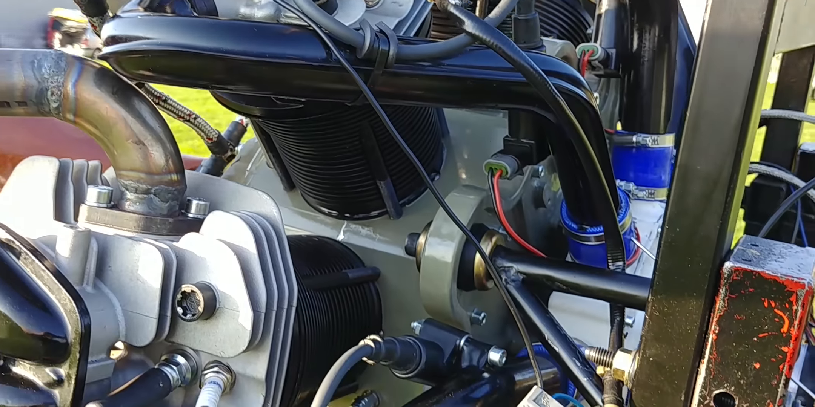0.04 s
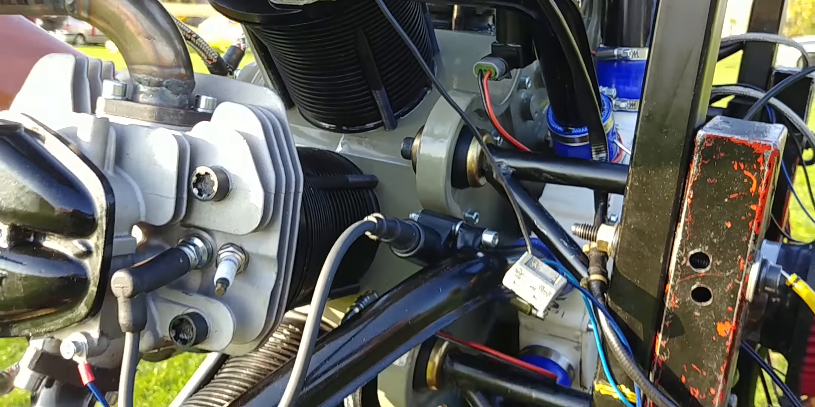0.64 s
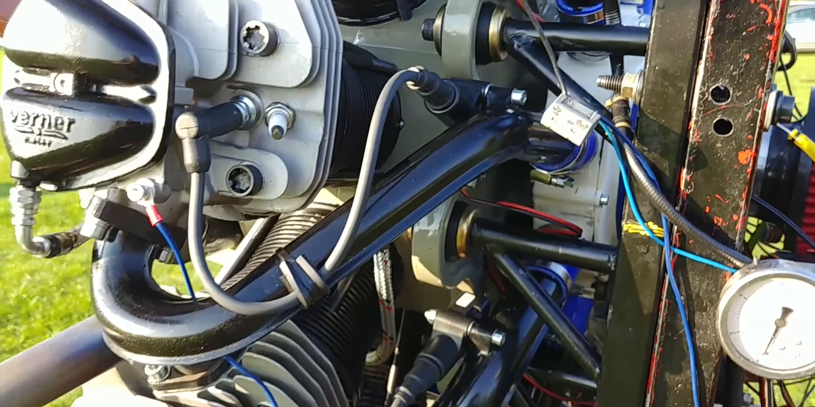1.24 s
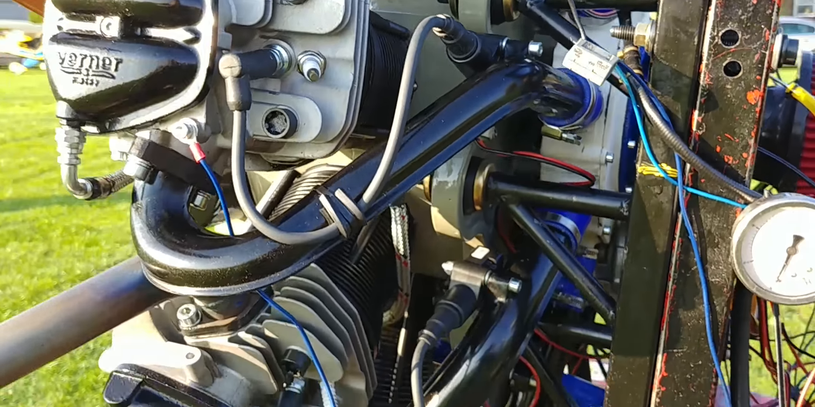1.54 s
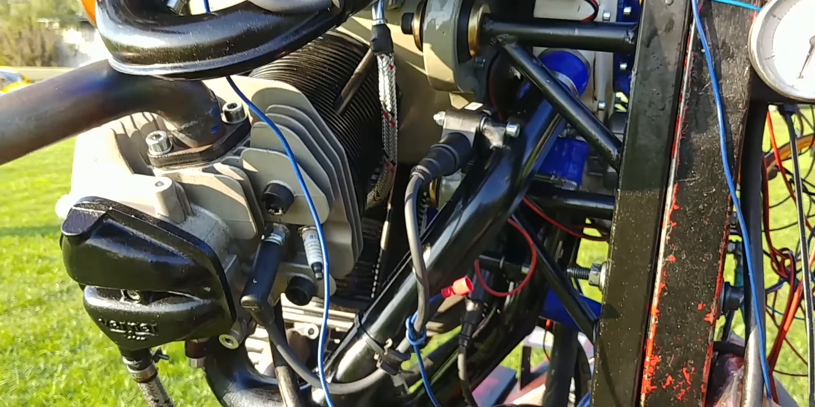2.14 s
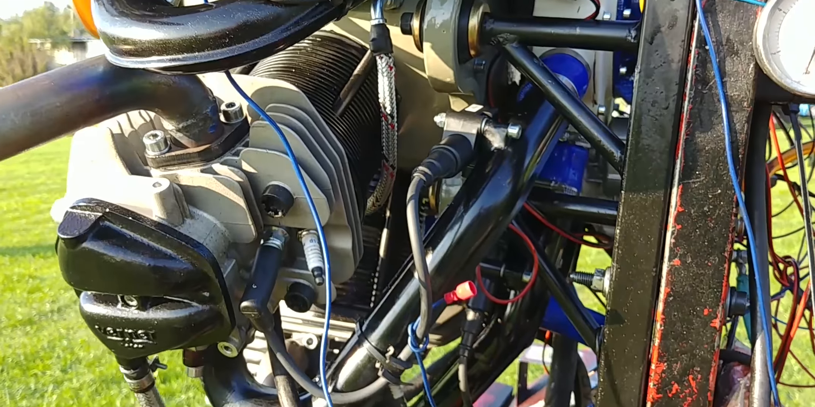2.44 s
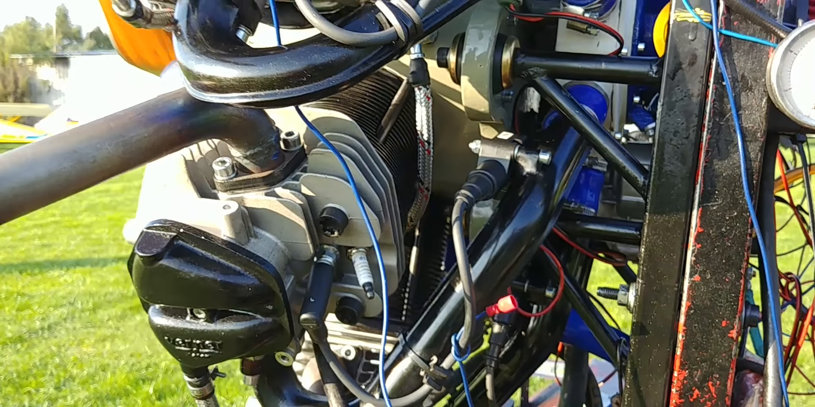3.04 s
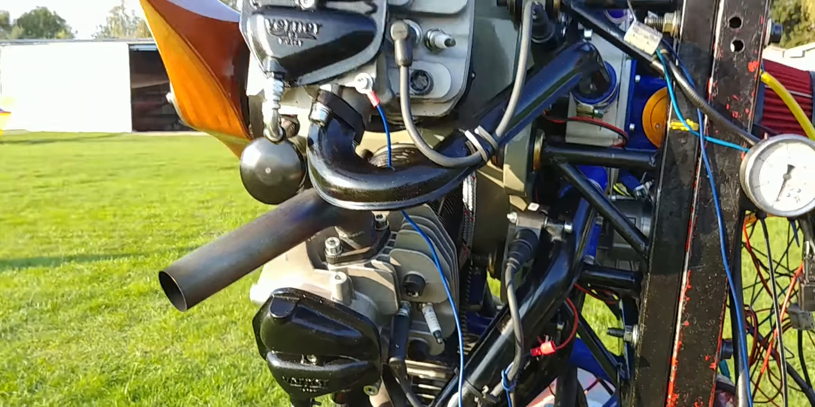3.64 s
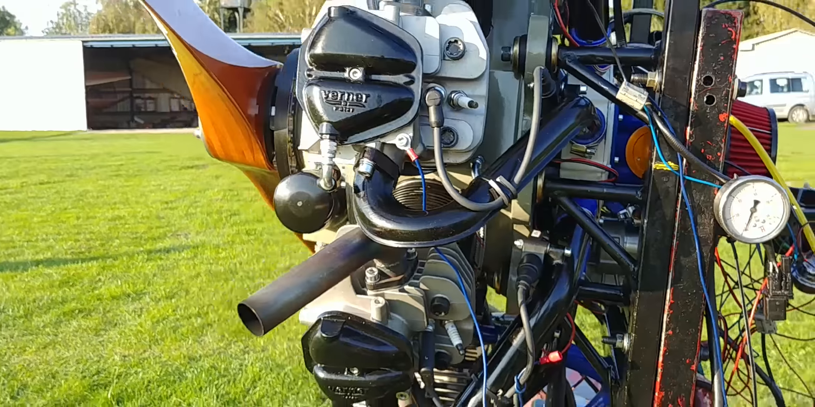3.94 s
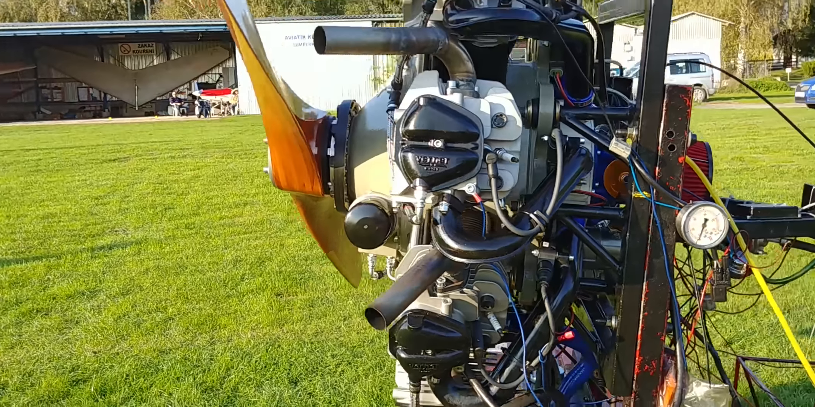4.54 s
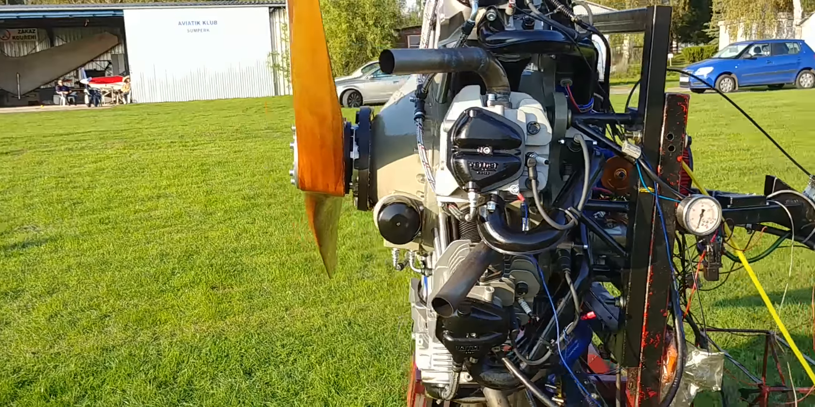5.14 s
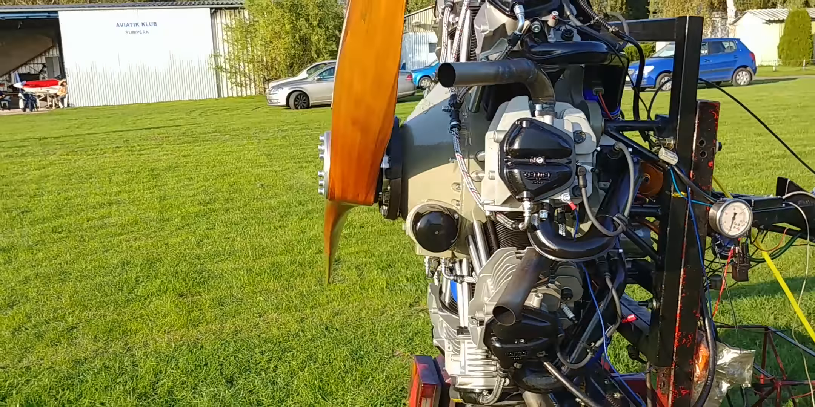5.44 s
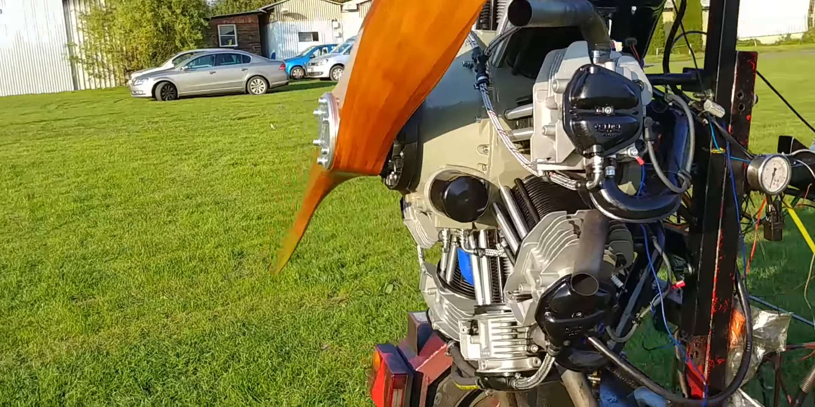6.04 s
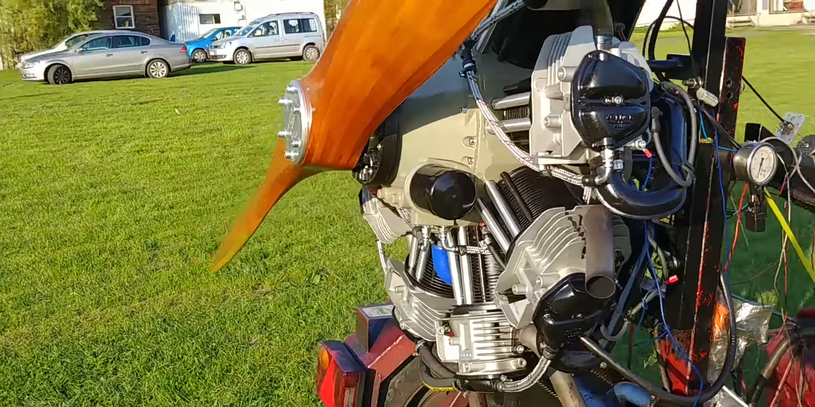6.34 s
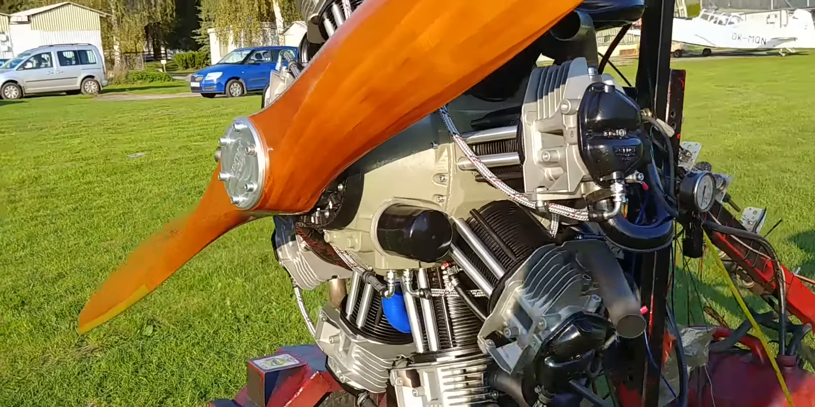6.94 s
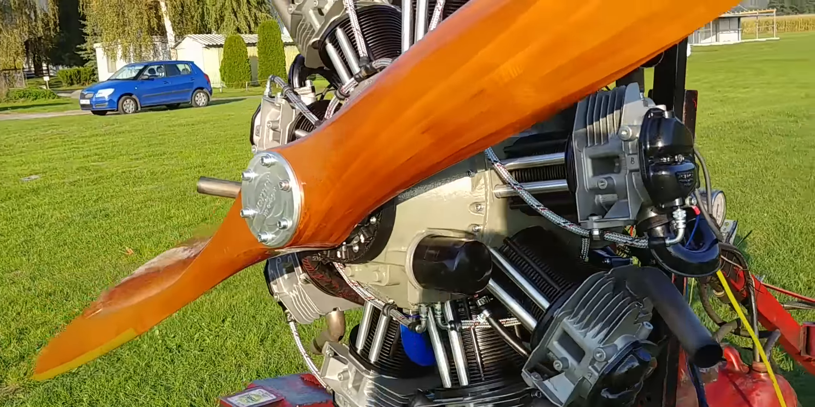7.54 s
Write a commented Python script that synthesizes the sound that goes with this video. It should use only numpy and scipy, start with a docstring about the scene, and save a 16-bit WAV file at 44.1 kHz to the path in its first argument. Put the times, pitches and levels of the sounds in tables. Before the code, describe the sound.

A radial aircraft engine idles fast with a deep throb, spitting exhaust and clinking valves, then speeds up as the propeller's buzzing wash takes over.

```python
"""A radial engine with a wooden propeller idles fast on a stand in a field, sags a little, then picks up.
Six exhaust beats fill each cycle of two turns. Together they make a deep throb, and each one spits
a rasp from the open pipes. The valve gear clinks and knocks. A two-sided microphone moves from the
cylinders to the front, where the rasp fades and the wash of air from the blades takes over."""
import sys
import numpy as np
from scipy import signal
from scipy.fft import rfft, irfft, next_fast_len
from scipy.io import wavfile
from scipy.ndimage import uniform_filter1d, minimum_filter1d

SR = 44100
rng = np.random.default_rng(int(sys.argv[2]) if len(sys.argv) > 2 else 0)


def wav_out(sig):
    """Save sig, one row per channel (or a flat mono array), as 16-bit PCM at SR to the path in sys.argv[1]."""
    wavfile.write(sys.argv[1], SR, np.round(np.clip(np.atleast_2d(sig).T, -1, 1) * 32767).astype(np.int16))


N = 343980
TIME_S = np.arange(N) / SR

# How fast the shaft turns: time_s, speed_rpm
SHAFT_SPEED = [(0, 1311), (.8, 1328), (1.26, 1243), (1.39, 1212), (1.92, 1194), (2.72, 1167), (3.63, 1168),
               (4.01, 1174), (4.06, 1185), (4.8, 1199), (5.22, 1252), (5.55, 1327), (5.9, 1385),
               (6.22, 1408), (6.57, 1425), (6.89, 1541), (7.18, 1628), (7.43, 1662), (7.66, 1674),
               (7.8, 1699)]
# The walk, from 0 beside the cylinders to 1 in front: time_s, position
WALK = [(0, 0.027), (3.7, 0.05), (4.2, 0.18), (5.2, 0.39), (6.2, 0.55), (6.75, 0.72), (7.8, 0.98)]
# How hard the engine works: time_s, boom_db, spit_share
EFFORT = [(0, 8.5, 0.86), (2.7, 8, 0.69), (4.3, 4, 0.42), (6.1, 6.5, 0.5), (7.2, 8, 0.2), (7.8, 6, 0.1)]
# The six exhaust beats: place_cycles, thump_db, spit_db, sizzle_db
BEATS = [(0.114, 8.5, 22, 20), (.272, -3, 19.5, 20), (0.437, -0.7, 15.5, 13), (0.621, 9, 21, 20),
         (0.785, 6, 21, 16.5), (0.942, 8, 20.5, 22)]
# Main harmonics, each swelling or dipping near one speed: harmonic, base_db, lift_db, at_rpm, width_rpm
MAIN_HARMONICS = [(6, -54.5, 27.5, 1682, 576), (7, -63.5, 24.5, 1320, 67), (9, -56, 20, 1453, 530),
                  (11, -53, 15.5, 1400, 300), (12, -38.5, 9.5, 1210, 256), (13, -47.5, -18, 1190, 82),
                  (14, -46.5, -0.5, 1200, 250), (15, -43, 10.5, 1335, 460), (16, -52, 9.5, 1600, 130),
                  (17, -44, 1.5, 420, 360), (18, -38, -23, 1376, 60), (20, -47.5, -12, 1100, 87),
                  (21, -56, 20, 1203, 225), (22, -63.5, 20, 1200, 360), (24, -45, 5.5, 1410, 70),
                  (27, -62, 17, 1170, 54), (28, -63.5, 14.5, 1395, 93), (30, -61, 12.5, 1296, 180)]
# The pipes' boom, which shapes the other harmonics: pitch_hz, level_db
BOOM_SPECTRUM = [(30, -89), (50, -86), (68, -58.5), (84, -52.5), (112, -56), (135, -46), (165, -50.5),
                 (225, -51), (262, -57.5), (287, -66.5), (345, -64), (410, -79.5), (520, -85), (700, -104)]
# The pipes' lowest resonances, which delay the thumps: pitch_hz, width_hz
PIPE_MODES = [(96, 20.8), (214, 48.5)]
# How the bass leans to one side: time_s, left_minus_right_db
BASS_SWAY = [(0, 0), (1.4, 2.1), (3.6, 3.2), (5.8, 2.2), (7.8, -.8)]
# The propeller's hum: blade_harmonic, level_db
DRONE_HARMONICS = [(1, -44), (2, -37.5)]
# One pipe's hollow pop: time_s, level_db
CHUG_LEVEL = [(0, -56), (1.1, -55.5), (2, -47.5), (2.8, -43), (3.7, -55), (4.6, -49.5), (5.3, -51.5),
              (6.1, -50.5), (7, -62), (7.8, -64)]
# The rasp's two lower resonances, changing as other pipes face us: time_s, level_db, pitch_hz
BARK = [(0, -50, 2380), (1.3, -44.5, 2000), (3.2, -40, 2320), (4.3, -43.5, 1926), (5.2, -43, 1870),
        (5.9, -41, 1930), (6.4, -43, 1780), (6.8, -49, 1665), (7.1, -50, 2040), (7.8, -50, 2200)]
RING = [(0, -42, 2800), (.8, -42, 3040), (1.401, -49, 3480), (2.699, -46, 3400), (3.502, -51, 3290),
        (4.099, -59.5, 3150), (5.1, -52.5, 3450), (5.4, -45, 3480), (6.1, -44, 3490), (6.4, -41.5, 3220),
        (6.6, -42.5, 2740), (6.85, -42.5, 2490), (7.05, -52, 2490), (7.2, -51, 3540), (7.8, -52.5, 3510)]
# Its two upper ones; the sizzle swells as a pipe's mouth sweeps past: time_s, level_db
HISS = [(0, -50.5), (.9, -55.5), (1.2, -59.5), (3.2, -56), (4.6, -48.5), (6.7, -46.5), (7.05, -54),
        (7.8, -56)]
SIZZLE = [(0, -44.5), (.9, -46), (1.3, -46.5), (3.1, -47), (3.42, -41.5), (3.7, -48), (4.3, -54.5),
          (5.1, -50), (5.4, -44.5), (5.65, -49.5), (6.1, -47), (6.8, -46.5), (7, -53.5), (7.8, -53.5)]
# Widths of bark, ring, hiss and sizzle in the pipes, heads and fins: side_octaves, front_octaves
METAL_WIDTHS = [(0.18, 0.21), (0.21, 0.14), (0.21, 0.23), (0.068, 0.072)]
# The highest treble: pitch_hz, level_db
FIZZ_SPECTRUM = [(5000, -27.5), (9000, -2), (10300, -39), (11800, -19), (13500, -5.5), (15800, -21.5)]
# Its brief swell: middle_s, lift_db, half_length_s
FIZZ_SWELLS = [(6.6, 17.5, 0.33)]
# The crankcase's echo along the walk: time_s, delay_ms, strength
CRANKCASE_ECHO = [(0, 2.66, 0.5), (.5, 2.17, 0.26), (1.3, 2.2, 0.12), (2.2, 1.79, 0.03), (4.5, 1.65, 0.01),
                  (6.5, 2.23, 0.14), (7.8, 1.7, .12)]
# The rasp of the pipes on the other side: time_s, level_db, pitch_hz
FAR_RASP = [(0, -61, 6300), (1, -59, 6200), (1.12, -70, 6000), (4.8, -73, 3600), (5.4, -48.5, 3610),
            (6.3, -51.5, 3470), (6.75, -44, 3370), (7.05, -50, 3370), (7.8, -67, 3290)]
# Air rushing off the blades: time_s, level_db, pitch_hz
BLADE_RUSH = [(0, -45, 1340), (1.4, -48, 1430), (3.2, -43, 1386), (4.3, -45, 1245), (5.4, -36.5, 1447),
              (6.65, -42.5, 1270), (7.25, -38, 1243), (7.8, -41, 1240)]
# The slap of the blades: pitch_hz, level_db
SLAP_SPECTRUM = [(400, -58.5), (500, -51.5), (580, -57.5), (770, -53.5), (880, -68), (1050, -60.5),
                 (1250, -59), (1400, -60), (1700, -72)]
# The valve gear's ring (a fade is a fall of 60 dB): pitch_hz, level_db, fade_s
VALVE_MODES = [(1670, -8.5, .03), (2070, 4.5, 0.11), (2260, -1, .04), (2430, 4.5, 0.089), (2658, 2, 0.1),
               (2880, -3, 0.083), (3380, 0, .045), (3540, -2, 0.058), (3820, -5.5, 0.045),
               (4620, -14, 0.045)]
# Its loudness, highest near the rocker covers: time_s, level_db
VALVE_LEVEL = [(0, -46), (1.4, -47.5), (2.5, -44), (3.3, -45), (4, -56), (7.8, -62)]
# The sharpest exhaust cracks: start_s, peak_db (not used), ring_db, sizzle_db
CRACKS = [(0.0827, -30, -38, -36), (0.2365, -28, -40, -51), (0.388, -28, -35, -32), (0.4475, -26, -40, -43),
          (0.539, -28, -37, -47), (0.63, -29, -32.5, -40), (0.7214, -27, -30.5, -33),
          (0.8113, -26, -33, -35), (0.9006, -23, -34, -26.5), (0.995, -28, -29.5, -42),
          (1.0906, -31, -55, -39.5), (1.1807, -29, -57, -36), (1.4447, -36, -42, -43),
          (1.476, -32, -38, -57), (1.5434, -34, -56, -41), (1.575, -21, -48, -42), (1.644, -33, -47, -39.5),
          (1.6767, -35, -40, -51), (1.7447, -32, -32, -46), (1.7759, -34, -44, -40.5),
          (1.8434, -32, -41, -35.5), (1.975, -27, -34, -33), (2.0757, -30, -35.5, -42.5),
          (2.146, -36, -45, -35.5), (2.449, -30, -31.5, -37), (2.5526, -33, -34, -49),
          (2.603, -34, -30, -54), (2.634, -34, -47, -55), (3.272, -32, -34, -54), (3.376, -30, -43.5, -49),
          (5.884, -34, -55, -42), (5.913, -26, -38, -59), (6.0551, -31, -33, -47), (6.2, -30, -40, -42.5),
          (6.3116, -29, -39, -37.5), (6.704, -29, -44, -38)]
# The two parts of a crack: pitch_hz, level_db
CRACK_RING = [(200, -61), (1200, -17), (2100, -3.5), (2600, 0), (3100, -7.5), (3700, 1.5), (4300, -8.5),
              (5500, -20.5), (9000, -73)]
CRACK_SIZZLE = [(3000, -60), (5500, -19), (6500, -13.5), (7700, -1), (8200, 0.5), (9000, -18.5),
                (10200, -53), (13000, -47), (15800, -54)]
# Dull knocks and thin valve pings: start_s, level_db, pitch_hz
KNOCKS = [(4.025, -42, 2080), (4.0572, -33, 1960), (4.2582, -32, 2030), (4.311, -32, 1930),
          (4.7576, -33, 1800), (4.8608, -30, 1960), (4.9064, -31, 1900), (4.9591, -38, 1930),
          (5.0056, -31, 1970), (5.0784, -26, 1840), (5.1497, -34, 1920), (5.197, -24, 1670),
          (5.25, -33, 2000), (5.3433, -29, 1930), (5.437, -32, 1120), (5.6403, -26, 1800),
          (5.7044, -34, 915), (5.7962, -33, 1990), (6.7283, -32, 1450), (7.1395, -27, 1300),
          (7.2456, -36, 1130), (7.3184, -38, 1340), (7.3362, -33, 1310), (7.4086, -29, 1100),
          (7.428, -34, 1150), (7.4435, -25.5, 1075), (7.4973, -38, 1330), (7.516, -36, 1220),
          (7.5708, -28, 1110), (7.7134, -27, 1160), (7.783, -28.5, 1250)]
PINGS = [(5.8845, -36, 7810), (6.0282, -38, 8100), (6.1998, -28.5, 7850), (6.2841, -37, 7740),
         (6.3694, -35, 7710), (6.7037, -30.5, 7800), (6.8638, -34.5, 7600)]
# How each of them rings: pitch_ratio, level_db, fade_s
KNOCK_MODES = [(.76, -2.5, 0.026), (1.001, 2.5, 0.043), (1.2, -5, 0.028)]
PING_MODES = [(0.999, 5, 0.042), (1.03, -3, 0.035)]
# How much of the right side's shading each pitch feels: pitch_hz, factor
RIGHT_SHADE = [(200, -2.5), (380, 0), (700, 0.82), (1500, 1.1), (2400, 0.94), (4000, 0.3), (5500, 1.2),
               (7700, 2), (9000, 0.8), (10500, 0)]
# How alike the two sides sound: pitch_hz, likeness
LIKENESS = [(300, 0.44), (700, 0.84), (1500, 0.63), (3200, 0.57), (5500, 0.18), (8000, 0.25),
            (11000, 0.082)]

LEFT_LAG_MS = (0.506, 0.033)  # beside the engine, in front
BLADE_PASSES, BLADE_PLACE = 4, 0.225  # passes per cycle; where in the cycle one falls


def amp(db):
    return 10 ** (np.asarray(db) / 20)


def unit(x):
    """Scale x to an average (rms) level of 1."""
    return x / np.sqrt(np.mean(x ** 2) + 1e-20)


def bell(x, centre, width):
    return np.exp(-((x - centre) / width) ** 2)


def at_pitch(points, hz):
    """Look up a (pitch_hz, value) table on a log scale."""
    pitches, values = np.transpose(points)
    return np.interp(np.log(hz + 1), np.log(pitches + 1), values)


def curves(rows):
    """One value per sample for each column after the time."""
    times, *columns = np.transpose(rows)
    return [np.interp(TIME_S, times, column) for column in columns]


def walked(side, front):
    """Slide from the side value to the front value along the walk."""
    return side + (front - side) * curves(WALK)[0]


def wobble(rate_hz):
    """A smooth random curve."""
    knots = rng.standard_normal(1024)
    return np.interp(TIME_S * rate_hz, np.arange(len(knots)), knots)


def filtered(x, gain_at):
    """Give each frequency its own gain."""
    size = next_fast_len(N + 8192)
    return irfft(rfft(x, size) * gain_at(np.fft.rfftfreq(size, 1 / SR)), size)[..., :N]


def noise(spectrum):
    """Two unrelated noises with the same spectrum."""
    return unit(filtered(rng.standard_normal((2, N)), lambda hz: amp(at_pitch(spectrum, hz))))


def resonant(drive, centre_hz, octaves, frame_lag_ms=0.448):
    """Two rushing flows follow drive, ring around one pitch and echo off the crankcase and frame."""
    flows = (drive * rng.standard_normal((2, N))).astype(np.float32)
    hz, times, spectra = signal.stft(flows, SR, nperseg=1024)
    tracks = (centre_hz, octaves, *curves(CRANKCASE_ECHO))
    centre, width, delay_ms, echo = (np.interp(times, TIME_S, np.broadcast_to(v, N)) for v in tracks)
    hump = np.exp(-(np.log2((hz[:, None] + 1) / centre) / (2 * width)) ** 2)
    delays_ms = (delay_ms, delay_ms + frame_lag_ms)
    comb = 1 + sum(echo * np.exp(-2j * np.pi * np.outer(hz, ms) / 1000) for ms in delays_ms)
    return unit(signal.istft(spectra * (hump * comb).astype(np.complex64), SR, nperseg=1024)[1][:, :N])


def throb(cycle, rpm, boom_db, lead_s=0.00619, unevenness=0.42, weak_db=-11):
    """Uneven exhaust beats add up to harmonics of the cycle; the pipes favour 80 to 260 Hz."""
    place, thump_db, *_ = np.transpose(BEATS)
    step = 6  # low tones need only every sixth sample
    rpm = rpm[::step]
    main_db = {round(k): db + lift * bell(rpm, at, width) for k, db, lift, at, width in MAIN_HARMONICS}
    harmonics = np.arange(5, 52)
    weak = (23, 29, 31, 34)  # here the beats nearly cancel
    pattern = np.exp(-2j * np.pi * np.outer(harmonics, place)) @ amp(thump_db)
    out = 0
    for k, beat, size in zip(harmonics, pattern, unit(np.abs(pattern) ** unevenness)):
        hz = k * rpm / 120
        waver_db = (boom_db + wobble(2.3))[::step] + weak_db * (k in weak)
        level = amp(main_db[k]) if k in main_db else size * amp(at_pitch(BOOM_SPECTRUM, hz) + waver_db)
        pipe_lag = sum(2 * np.arctan2(hz * width, mode ** 2 - hz ** 2) for mode, width in PIPE_MODES)
        phase = 2 * np.pi * (k * cycle[::step] + hz * lead_s) + np.angle(beat) - pipe_lag
        out = out + level * np.sqrt(2) * np.cos(phase)
    return signal.resample_poly(out, step, 1)[:N]


def rumble(boom_db, rough_db=-45, buffet_db=-74):
    """No two firings are alike, which adds a faint rough boom; air lightly buffets the microphone."""
    rough = amp(boom_db + rough_db) * noise(BOOM_SPECTRUM)[0]
    buffet = amp(buffet_db) * noise([(15, -4), (35, 0), (80, -8), (300, -40), (1000, -100)])[0]
    return rough + buffet


def blade_drone(cycle):
    """Two blades pass twice in every cycle; their hum is heard mostly in front."""
    phase = 2 * np.pi * BLADE_PASSES * cycle
    hum = sum(amp(db) * np.sqrt(2) * np.sin(round(k) * phase) for k, db in DRONE_HARMONICS)
    return amp(walked(side=-28.5, front=3.5)) * hum


def gas_spits(cycle, lead_s=0.0027, rise_s=0.0012, decay_s=0.003, jitter_s=0.00081, scatter_db=2):
    """Every beat lets out a quick puff of gas. Gives two flows: for the rasp and for the sizzle."""
    place, _, *levels_db = np.transpose(BEATS)
    cycles = np.arange(int(cycle[-1]) + 1)
    chance = rng.standard_normal((len(cycles) * len(BEATS), 3))
    beat_s = np.interp((cycles[:, None] + place).ravel(), cycle, TIME_S, right=N)
    start_s = beat_s - lead_s + jitter_s * chance[:, 0]
    sizes = amp(np.tile(levels_db, len(cycles)) + scatter_db * chance[:, 1:].T)
    heard = (start_s > 0) & (start_s < TIME_S[-1])
    starts = (start_s[heard] * SR).astype(int)
    t = TIME_S[:SR // 20]
    puff = (1 - np.exp(-t / rise_s)) ** 2 * np.exp(-t / decay_s)
    return [unit(signal.fftconvolve(np.bincount(starts, size[heard], N), puff)[:N]) for size in sizes]


def exhaust_rasp(flow, jet, spit_share, fizz_db=-84, uneven_db=3.0):
    """Spitting gas rings in the metal over a steady rush; the top resonance pulses most sharply."""
    swell_db = sum(db * bell(TIME_S, middle_s, half_s) for middle_s, db, half_s in FIZZ_SWELLS)
    out = amp(fizz_db + swell_db) * noise(FIZZ_SPECTRUM) * np.sqrt((1 + jet ** 2) / 2)
    # gas, level_db, pitch_hz
    bands = [(flow, *curves(BARK)), (flow, *curves(RING)),
             (flow, *curves(HISS), 5400), (jet, *curves(SIZZLE), 7710)]
    for (gas, db, hz), widths, pulsing in zip(bands, METAL_WIDTHS, np.linspace(0.92, 1, len(bands))):
        share = np.clip(spit_share * pulsing, 0, 1)
        uneven_gas = unit(gas * amp(uneven_db * wobble(60)))
        drive = np.sqrt(1 - share + share * uneven_gas ** 2)
        out += amp(db) * resonant(drive, hz, walked(*widths))
    return out


def far_rasp(flow):
    """The rasp of the far pipes reaches only the right side."""
    db, hz = curves(FAR_RASP)
    return np.array([np.zeros(N), amp(db) * resonant(np.sqrt(1 + flow ** 2), hz, octaves=0.13)[0]])


def blade_wash(cycle, flow, spit_share, sharpness=1.9):
    """Air rushes off each blade, in front as a hard knock; near the pipes the exhaust beats in it too."""
    passing = np.exp(sharpness * (np.cos(2 * np.pi * BLADE_PASSES * (cycle - BLADE_PLACE)) - 1))
    blade = 1 + amp(walked(side=-0.5, front=5)) ** 2 * passing
    exhaust_share = np.clip(0.3 * spit_share ** 2, 0, 1)
    drive = np.sqrt((1 - exhaust_share) * blade / blade.mean() + exhaust_share * flow ** 2)
    rush_db, rush_hz = curves(BLADE_RUSH)
    roar = resonant(np.sqrt(drive), centre_hz=710, octaves=0.6)
    rush = resonant(drive, rush_hz, octaves=walked(side=0.44, front=0.26))
    return amp(walked(side=-52, front=-44)) * roar + amp(rush_db) * rush


def blade_slap(cycle, rpm):
    """Each blade pushes the same sharp pulse of air ahead of it, making a clean buzz."""
    blade_hz = 2 * rpm / 60
    phase = 2 * np.pi * BLADE_PASSES * (cycle - BLADE_PLACE)
    buzz = sum(amp(at_pitch(SLAP_SPECTRUM, k * blade_hz)) * np.cos(k * phase) for k in range(9, 31))
    return amp(walked(side=-16.5, front=1.5)) * np.sqrt(2) * buzz


def valve_taps(cycle, lag_cycles=0.002, scatter_db=4.5, detune=0.015):
    """A rocker taps with every beat; each tap rings the steel with its own mix of tones."""
    places = (np.arange(int(cycle[-1]))[:, None] + np.transpose(BEATS)[0] + lag_cycles).ravel()
    starts = np.interp(places, cycle, np.arange(N)).astype(int)
    hz, db, fade_s = np.transpose(VALVE_MODES)
    out, t = np.zeros(N + SR), TIME_S[:SR // 16, None]
    fading = amp(db - 60 * t / fade_s)
    for start, (shift, *mix) in zip(starts, rng.standard_normal((len(starts), 1 + len(hz)))):
        tones = fading * np.sin(2 * np.pi * hz * (1 + detune * shift) * t)
        out[start:][:len(t)] += tones @ amp(scatter_db * np.array(mix))
    return amp(curves(VALVE_LEVEL)[0]) * unit(out[:N])


def pipe_chug(cycle, place=0.66, pitch_hz=327.7, rise_s=0.0075, scatter_db=3.3, lean_left_db=11.5):
    """Once in every cycle one pipe gives a hollow pop above the throb."""
    starts = np.interp(np.arange(int(cycle[-1])) + place, cycle, np.arange(N)).astype(int)
    kicks = np.bincount(starts, amp(scatter_db * rng.standard_normal(len(starts))), N)
    t = TIME_S[:SR // 12]
    pop = (t / rise_s * np.exp(-t / rise_s)) ** 3 * np.sin(2 * np.pi * pitch_hz * t)
    pan = amp([[lean_left_db / 2], [-lean_left_db / 2]])
    return pan * amp(curves(CHUG_LEVEL)[0]) * unit(signal.fftconvolve(kicks, pop)[:N])


def exhaust_cracks(rise_s=0.00019):
    """Now and then a pipe spits much harder, each time with its own mix of ring and sizzle."""
    t = TIME_S[:SR // 20]
    start_s, _, ring_db, sizzle_db = np.transpose(CRACKS)
    parts = [(ring_db + 1, CRACK_RING, 0.0088), (sizzle_db + 2, CRACK_SIZZLE, 0.0065)]
    out = 0
    for db, spectrum, decay_s in parts:
        kicks = np.bincount((start_s * SR).astype(int), amp(db), N)
        burst = (1 - np.exp(-t / rise_s)) * np.exp(-t / decay_s)
        out = out + signal.fftconvolve(kicks, burst)[:N] * noise(spectrum)
    return out


def struck(blows, modes, rise_s):
    """Each blow on metal rings a few fading tones."""
    out, t = np.zeros(N + SR), TIME_S[:SR // 10]
    for start_s, db, hz in blows:
        ring = sum(amp(db + mode_db - 60 * t / fade_s) * np.sin(2 * np.pi * (hz * ratio * t + rng.random()))
                   for ratio, mode_db, fade_s in modes)
        out[int(start_s * SR):][:len(t)] += ring * (1 - np.exp(-t / rise_s))
    return out[:N]


def knocks_and_pings():
    """Slack in the valve gear and drive knocks dully; now and then a valve gives a thin ping."""
    return struck(KNOCKS, KNOCK_MODES, rise_s=0.0013) + struck(PINGS, PING_MODES, rise_s=0.00072)


def microphone_sides(pair):
    """The left side faces the engine; the right is shaded, less clear in the treble and a little early."""
    hz, times, (direct, scattered) = signal.stft(pair, SR, nperseg=512)
    lag_ms = np.interp(times, TIME_S, walked(*LEFT_LAG_MS))
    shade_db = np.interp(times, TIME_S, walked(side=12, front=7))
    alike = np.clip(at_pitch(LIKENESS, hz), 0, 1)[:, None]
    shade = amp(-np.outer(at_pitch(RIGHT_SHADE, hz), shade_db))
    lead = np.exp(2j * np.pi * np.outer(hz, lag_ms) / 1000)
    right = shade * lead * (alike * direct + np.sqrt(1 - alike ** 2) * scattered)
    return np.array([pair[0], signal.istft(right, SR, nperseg=512)[1][:N]])


def bass_sides(bass, lag_share=0.45):
    """Long waves bend round the microphone and reach both sides, only a little apart."""
    lag_s = lag_share * walked(*LEFT_LAG_MS) / 1000
    sway_db, = curves(BASS_SWAY)
    return [amp(side * sway_db) * np.interp(TIME_S - side * lag_s, TIME_S, bass) for side in (.5, -.5)]


def scene():
    """The shaft sets the rhythm: one four-stroke cycle takes two turns."""
    rpm, = curves(SHAFT_SPEED)
    cycle = np.cumsum(rpm / 120) / SR  # cycles done so far
    boom_db, spit_share = curves(EFFORT)
    flow, jet = gas_spits(cycle)
    clatter = valve_taps(cycle) + knocks_and_pings() + blade_slap(cycle, rpm)
    pair = exhaust_rasp(flow, jet, spit_share) + blade_wash(cycle, flow, spit_share) + exhaust_cracks()
    pair[0] += clatter  # direct sound only
    upper = microphone_sides(pair) + far_rasp(flow)
    bass = throb(cycle, rpm, boom_db) + blade_drone(cycle) + rumble(boom_db)
    return upper + pipe_chug(cycle) + bass_sides(bass)


def record(dry, ceiling_db=-18.5, reaction_s=0.011, top_hz=15800):
    """A limiter holds down the peaks, and the very highest treble is cut off."""
    window = int(reaction_s * SR)
    needed = np.minimum(1, amp(ceiling_db) / (np.abs(dry).max(axis=0) + 1e-9))
    gain = uniform_filter1d(minimum_filter1d(needed, window), window)
    return filtered(dry * gain, lambda hz: hz < top_hz)


dry = scene()
out = record(dry)
wav_out(out)
```